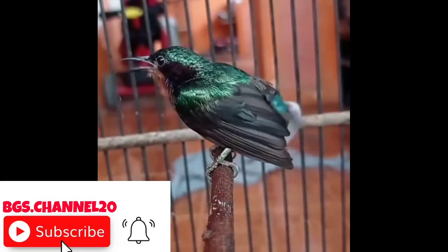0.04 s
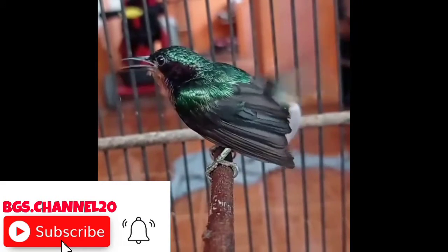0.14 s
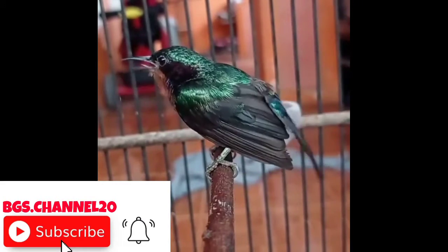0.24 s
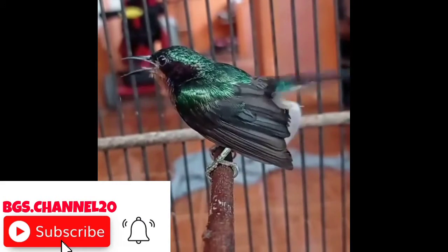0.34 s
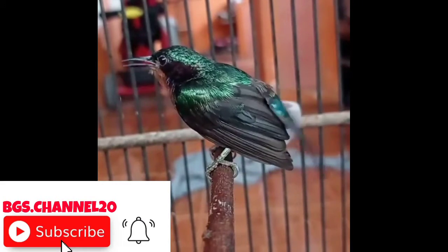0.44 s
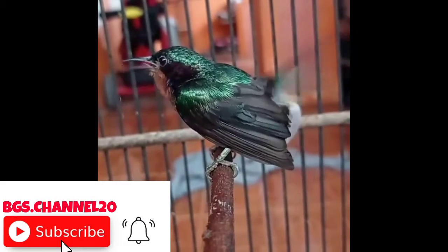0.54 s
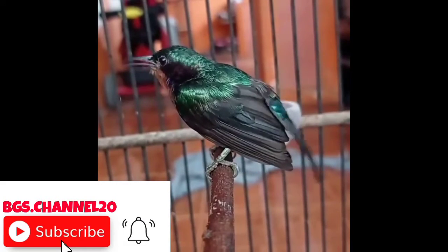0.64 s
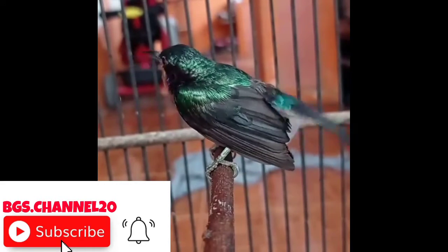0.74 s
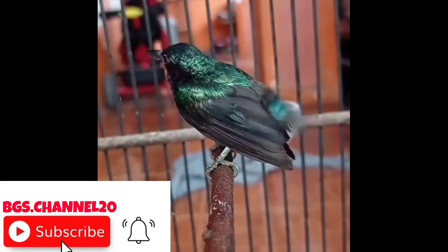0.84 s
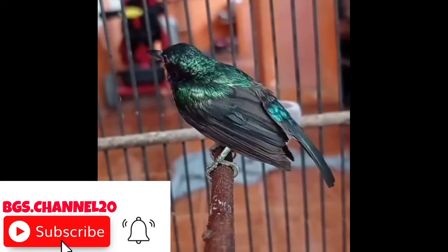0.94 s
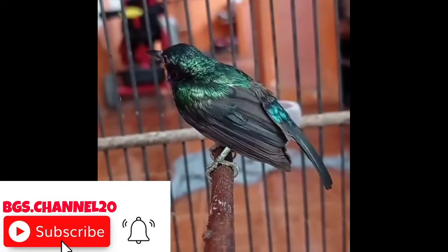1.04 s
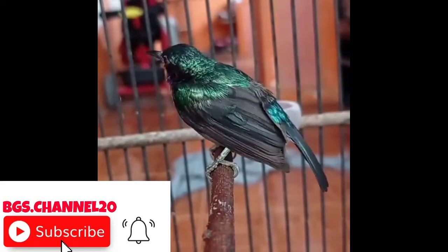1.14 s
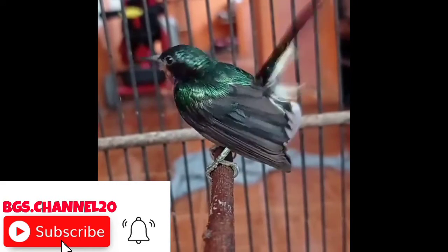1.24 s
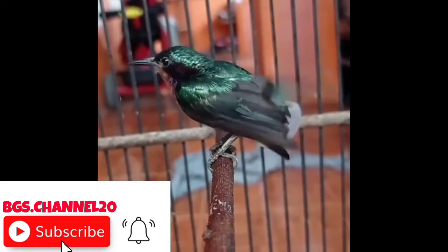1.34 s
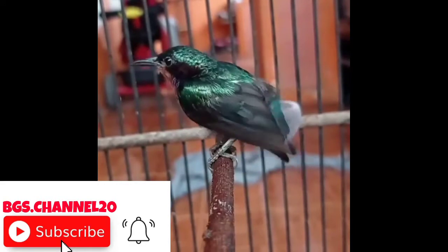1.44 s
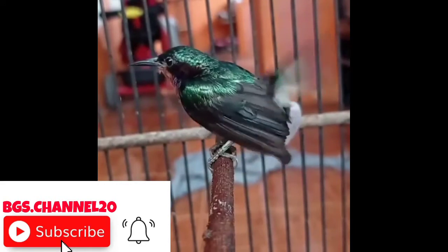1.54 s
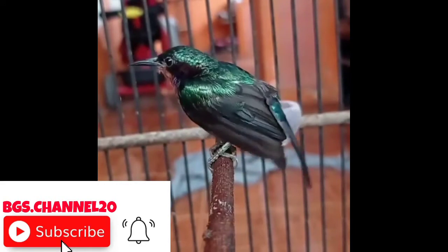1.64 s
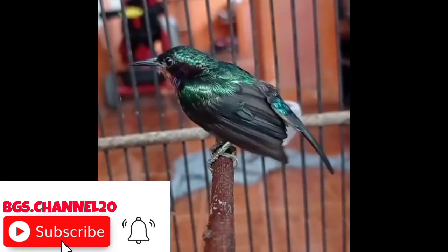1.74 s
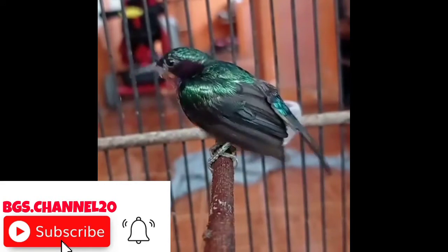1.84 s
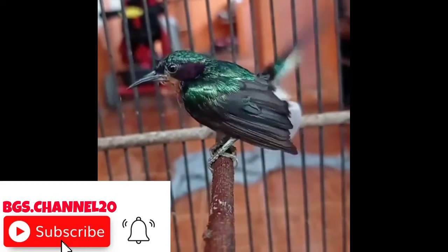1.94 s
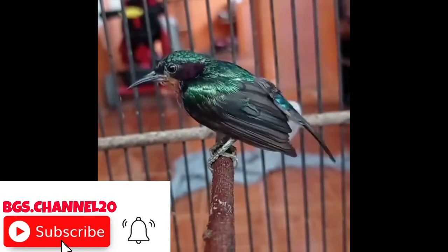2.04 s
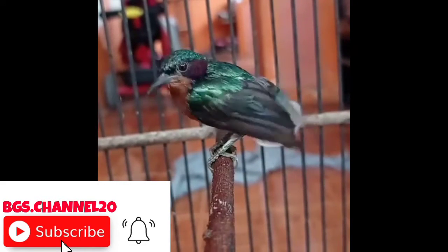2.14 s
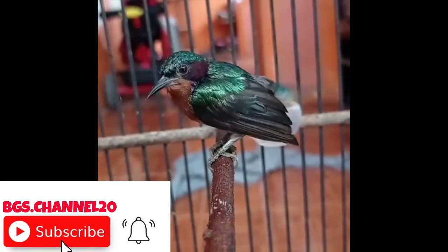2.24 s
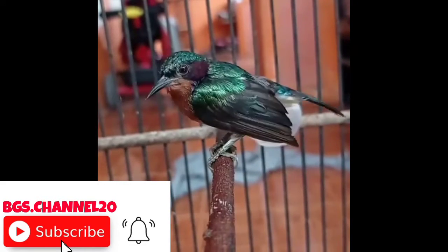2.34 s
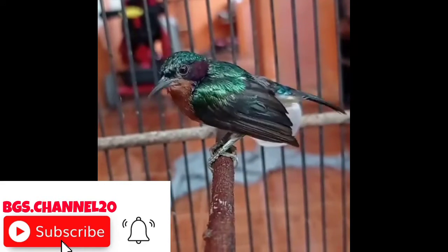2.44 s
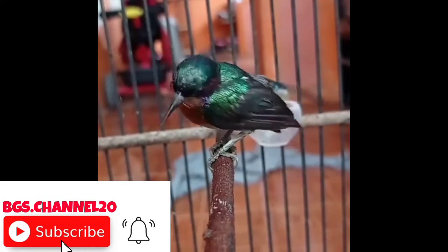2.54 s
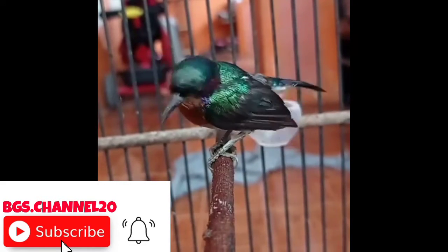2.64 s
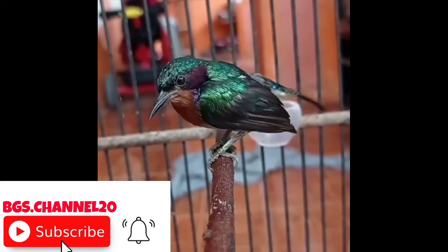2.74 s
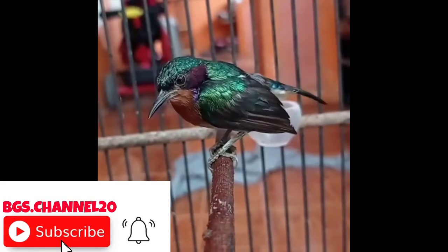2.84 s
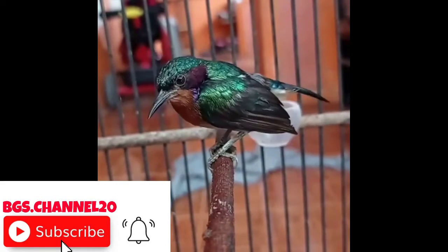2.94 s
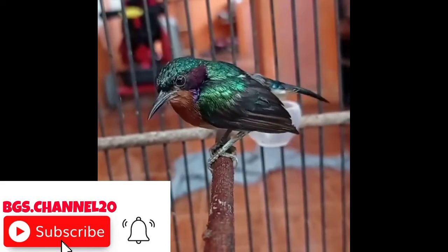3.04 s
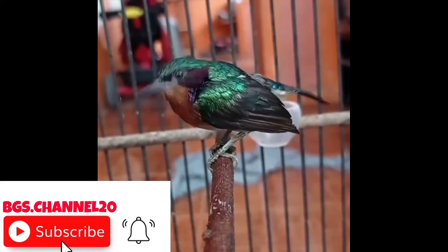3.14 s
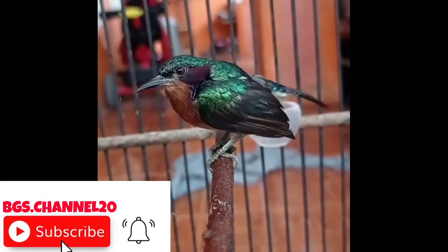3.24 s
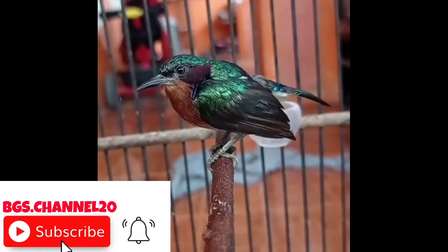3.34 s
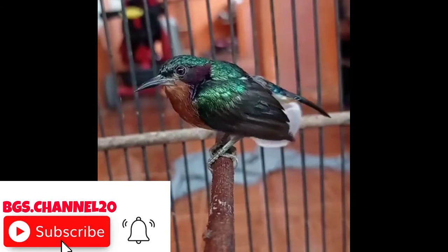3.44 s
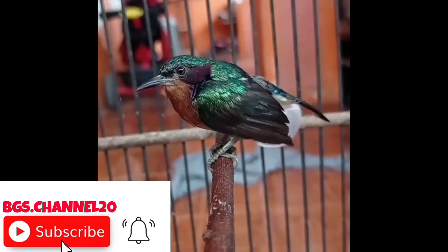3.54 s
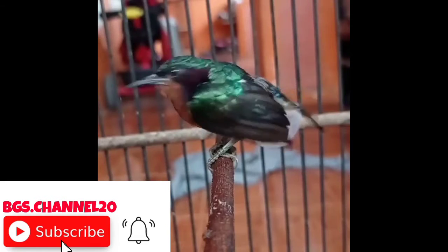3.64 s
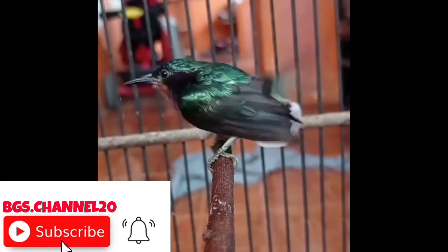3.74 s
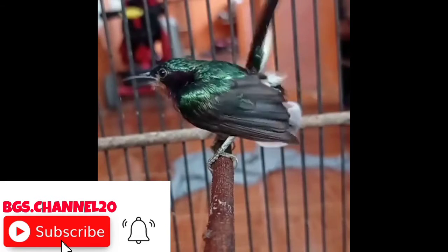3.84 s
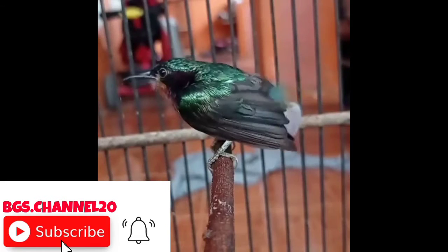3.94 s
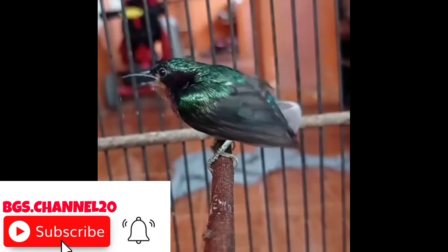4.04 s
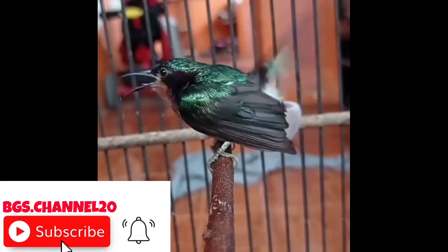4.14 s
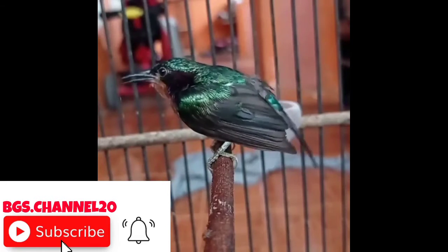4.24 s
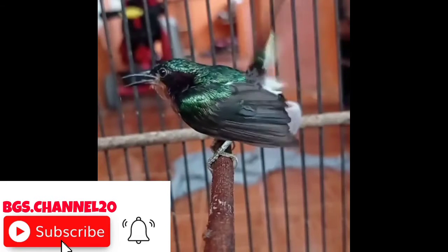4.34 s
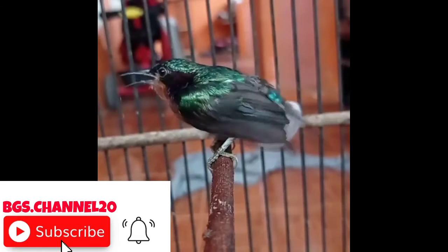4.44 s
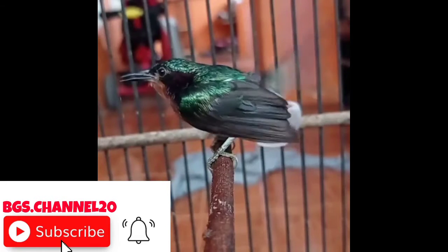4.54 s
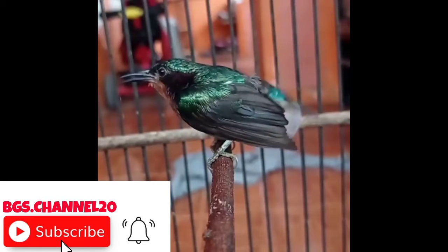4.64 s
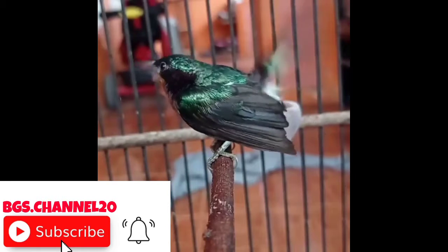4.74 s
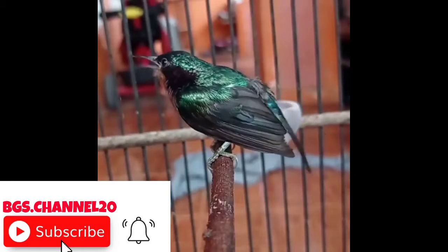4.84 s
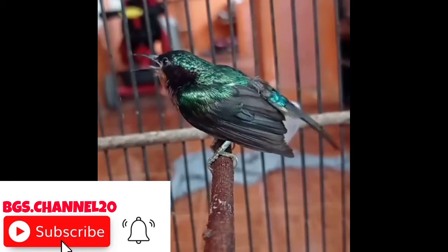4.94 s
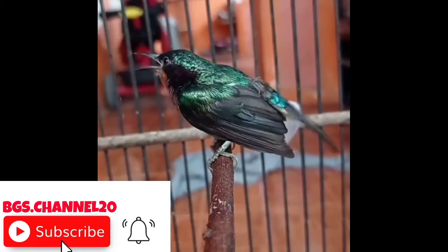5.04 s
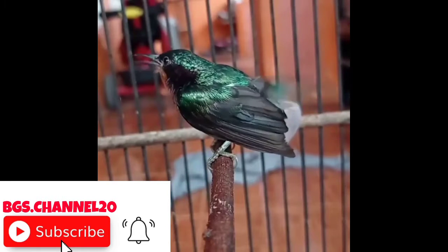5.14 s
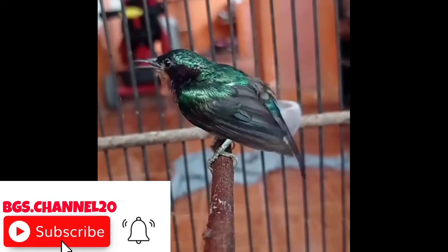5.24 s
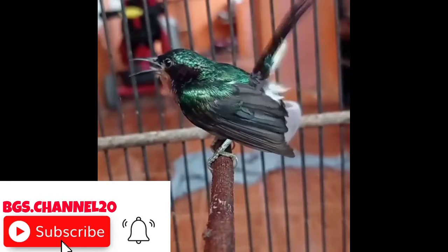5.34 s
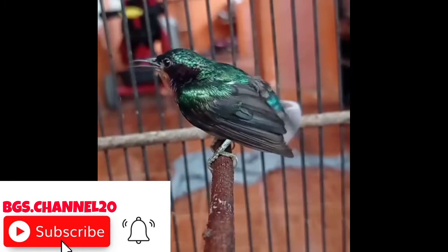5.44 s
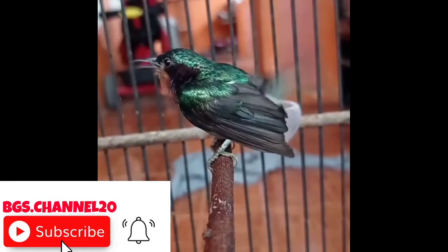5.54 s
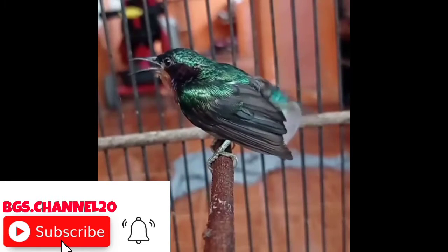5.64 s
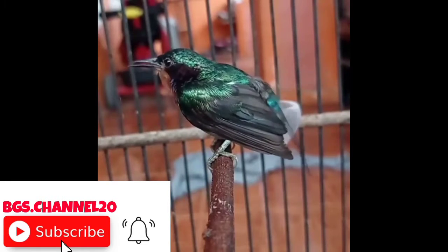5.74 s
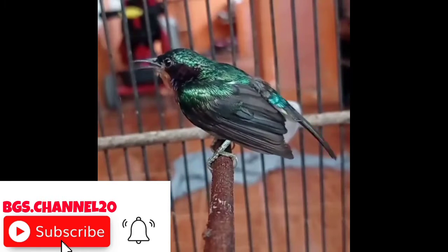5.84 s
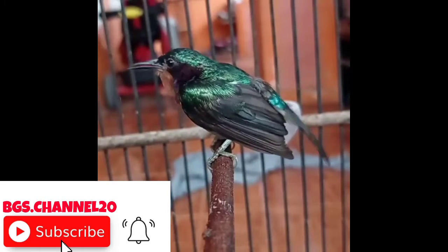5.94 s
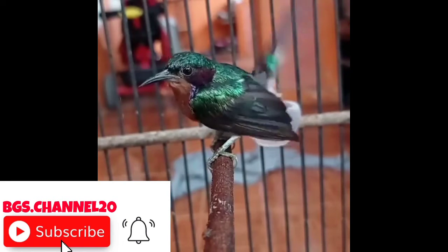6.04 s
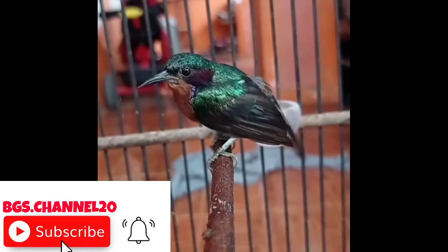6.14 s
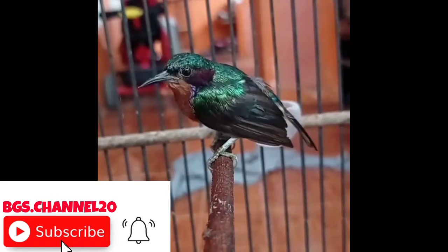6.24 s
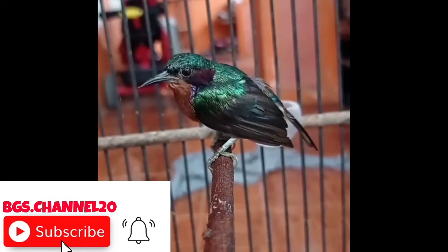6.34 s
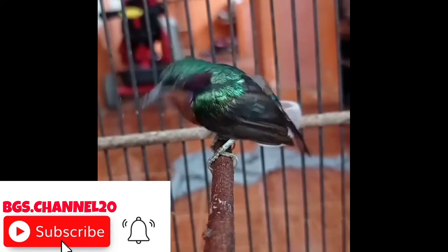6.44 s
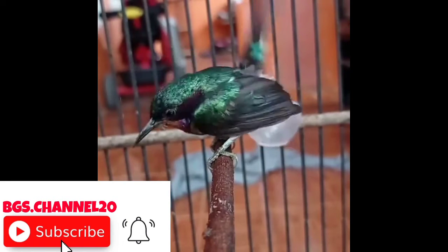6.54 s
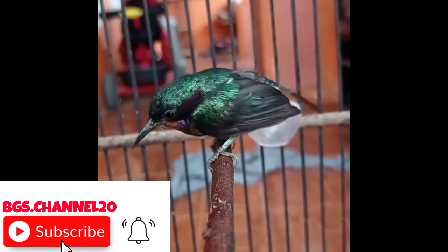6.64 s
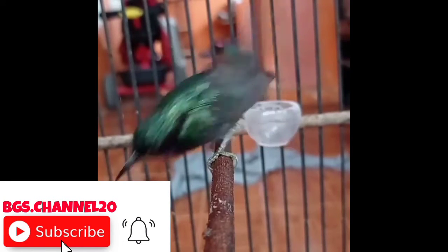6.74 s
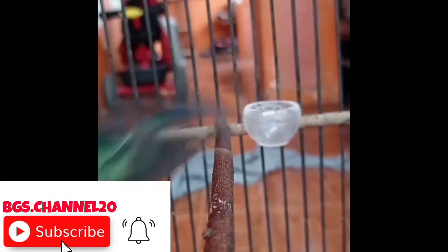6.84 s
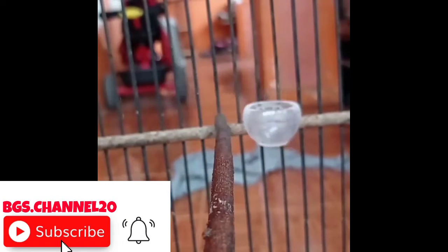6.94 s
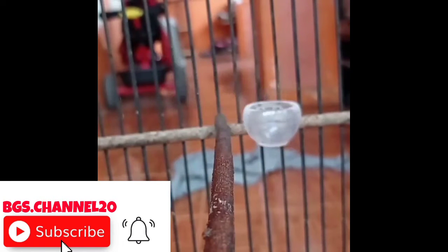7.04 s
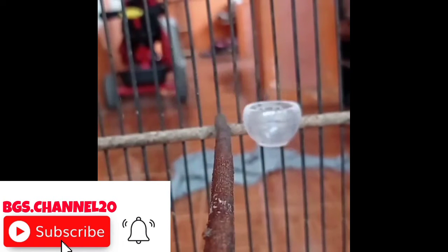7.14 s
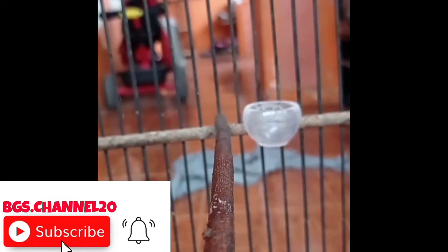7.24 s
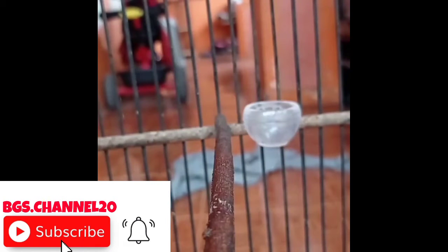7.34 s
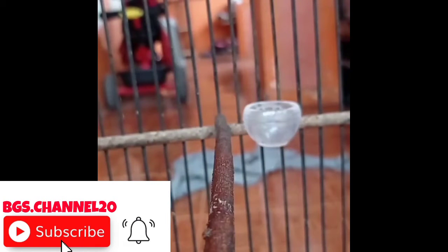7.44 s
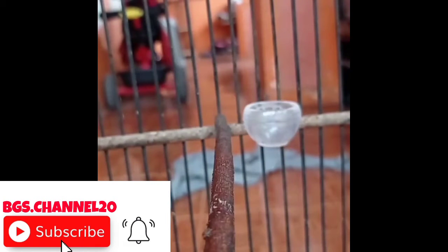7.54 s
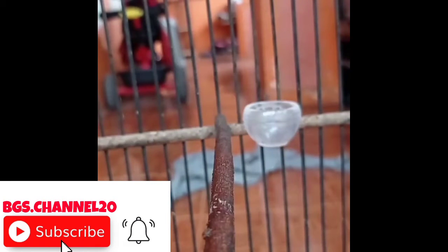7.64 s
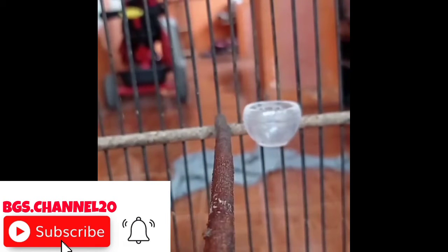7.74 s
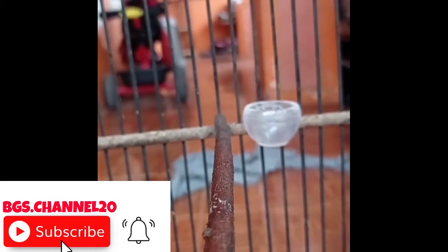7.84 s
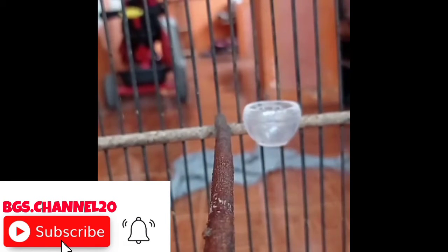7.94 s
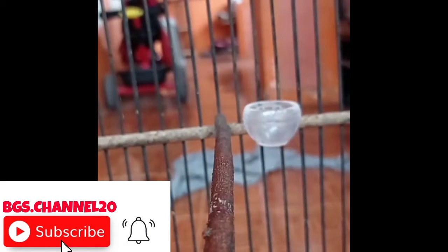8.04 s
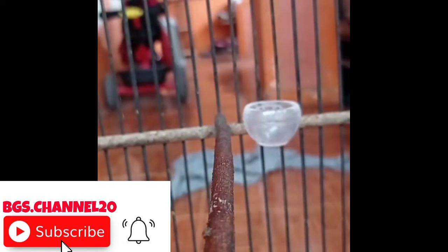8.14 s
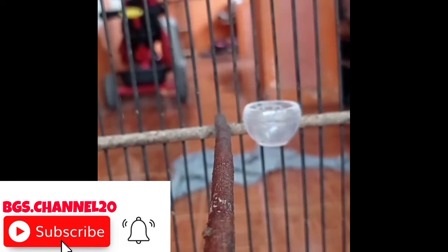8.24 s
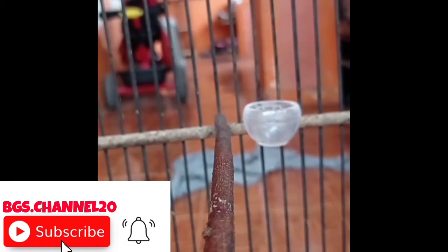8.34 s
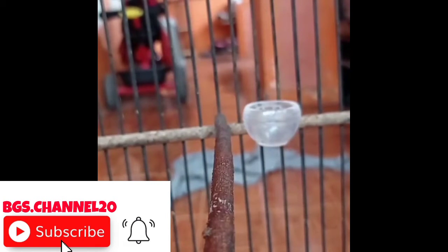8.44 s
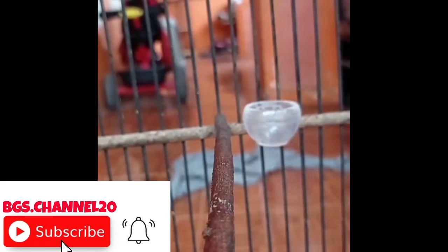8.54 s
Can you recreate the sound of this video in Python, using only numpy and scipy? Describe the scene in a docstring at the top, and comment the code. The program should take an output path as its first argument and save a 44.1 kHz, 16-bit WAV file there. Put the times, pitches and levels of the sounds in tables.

```python
"""A caged sunbird twitters close by: short dipping notes, falling sweeps and sharp chips, with faint cage ticks.
Farther off a second bird sings falling sweeps, washed in the ring of a hard-walled porch.
Behind them street noise rises and falls, a distant horn and a short toot sound, a motorbike draws near.
Birds are sines with gliding pitch, rasp and a second voice, convolved with reflections; traffic is shaped
noise; horns and motorbike are sums of harmonics."""
import sys
import numpy as np
from scipy import signal
from scipy.fft import rfft, irfft
from scipy.io import wavfile
from scipy.ndimage import uniform_filter1d

SR = 44100
rng = np.random.default_rng(int(sys.argv[2]) if len(sys.argv) > 2 else 0)


def to_wav(s):
    """Save 16-bit WAV."""
    ch = np.atleast_2d(s).T  # columns
    pcm = np.round(np.clip(ch, -1, 1) * 32767)  # PCM
    wavfile.write(sys.argv[1], SR, pcm.astype(np.int16))


N = 378378
TIME_S = np.arange(N) / SR

# All levels are relative: the mix and the spectra scale them further.
# Street noise. Each row: time in seconds, boom level in dB, rumble level in dB, roar level in dB.
TRAFFIC_LEVELS = [(0, -64.5, -76, -83), (.3, -69.5, -76, -76), (.6, -63.5, -68, -63),
                  (1.6, -57.5, -52, -56), (2.4, -61, -54.5, -55.5), (3.15, -52.5, -46.5, -48.5),
                  (3.7, -49.5, -54.5, -55), (4.25, -48, -54.5, -50.5), (4.55, -50, -58.5, -58),
                  (5.031, -57.5, -54, -56.5), (5.352, -53, -61.5, -74.5), (5.8, -56.5, -64.5, -57.5),
                  (6.2, -47, -48, -60), (6.5, -52.5, -54.5, -64), (7.15, -41.5, -43.5, -50.5),
                  (7.4, -57, -51, -52), (8.1, -50, -50, -47.5), (8.58, -48, -43, -42)]
# Low street band. Each row: frequency in Hz, density in dB per Hz.
BOOM_SPECTRUM = [(25, -31), (50, -23.5), (80, -5.5), (120, -7.5), (190, -16.5), (2000, -100)]
# Middle street band. Each row: frequency in Hz, density in dB per Hz.
RUMBLE_SPECTRUM = [(70, -39.5), (135, -1.5), (230, -4), (350, -4), (480, -20), (4000, -100)]
# Upper street band. Each row: frequency in Hz, density in dB per Hz.
ROAR_SPECTRUM = [(200, -17.5), (400, -2.5), (660, -3.5), (820, -15.5), (1200, -22.5), (2400, -52),
                 (9000, -83.5)]
# Narrow low peaks in the street noise, many at motorbike harmonics. Each row: frequency in Hz, boost in dB.
STREET_PEAKS = [(97, 8), (135, 2), (194, 3), (228, 7.5), (350, 1), (455, 0), (615, 9.5)]
# Tyre hiss. Each row: time in seconds, level in dB.
TYRE_LEVELS = [(0, -86.5), (.6, -74.5), (1.1, -78), (2.2, -67), (3.7, -62.5), (4.2, -65), (4.55, -72),
               (5.1, -73), (6.25, -67), (7.2, -56.5), (8.1, -52.5), (8.58, -47)]
# Tyre hiss. Each row: frequency in Hz, density in dB per Hz.
TYRE_SPECTRUM = [(300, -19.5), (800, 13), (1400, 10.5), (2400, 6), (4000, 2.5), (6500, 3.5), (8500, -17),
                 (10500, -20), (13000, -39)]
# Steady air noise. Each row: frequency in Hz, density in dB per Hz.
AIR_SPECTRUM = [(200, -17.5), (450, -15.5), (670, 17), (900, -10.5), (2800, -18.5), (4500, 6.5),
                (7000, -0.5), (8500, -30.5), (13000, -10)]
# Horns. Each row: start in seconds, length in seconds, fundamental in Hz, number of the loudest harmonic,
# level of that harmonic in dB, fall per harmonic away from it in dB.
HORN_CALLS = [(2.953, 1.17, 150.4, 5, -58, 7.5), (7.234, 0.019, 358, 4, -46.5, 11)]
# Motorbike. Each row: time in seconds, firings per second, level in dB.
MOTORBIKE_COURSE = [(0, 22, -72), (1.7, 21, -63), (2.2, 19.4, -53), (2.9, 17.8, -54), (3.3, 20, -50),
                    (4.1, 16.1, -49), (4.7, 17, -60), (5.7, 18, -61), (6.3, 18.1, -51), (7.1, 18.6, -48),
                    (7.27, 18.5, -40), (7.56, 18.5, -39.5), (7.68, 19.25, -39.2), (8.1, 19.35, -38.2),
                    (8.58, 19.45, -34)]
# Exhaust resonances. Each row: frequency in Hz, gain in dB.
EXHAUST_RESPONSE = [(50, -31), (80, -11), (92, -8), (97, 11), (110, 4), (130, 8), (160, -4), (190, 3.5),
                    (225, 5), (270, -14), (300, -0.5), (350, -1), (410, -7), (455, -2), (500, -8),
                    (620, -8), (800, -24.5)]
# Cage wire ticks. Each row: start in seconds, level in dB.
CAGE_TICKS = [(7.24, -52), (8.125, -52)]
# Reverberation time of the porch. Each row: frequency in Hz, time to fall 60 dB in seconds.
PORCH_T60 = [(7000, 0.42), (12000, 0.23)]
# Hoarse noise of the syrinx. Each row: frequency in Hz, density in dB per Hz.
RASP_SPECTRUM = [(300, -26), (2800, -0.5), (4500, 15), (7000, 25), (8800, 5.5), (10800, -2), (13000, -20.5)]
# Far bird's sweeps. Each row: start in seconds, length in seconds, top in Hz, bottom in Hz,
# ease (higher levels out earlier), level in dB, fade over the note in dB, rasp in dB.
FAR_SWEEPS = [(0.0, 0.11, 7770, 3880, 2.3, -48, 23, -16), (0.02, 0.13, 5500, 3750, 1.2, -49, 6, -32),
              (0.284, 0.22, 7440, 3660, 2.5, -42.5, 29, -45), (0.685, 0.11, 7060, 3330, 1.44, -43, 19, -34),
              (0.881, 0.098, 7500, 3210, 4.5, -44.5, 17, -40), (0.931, 0.2, 7310, 3020, 1.24, -42, 21, -21),
              (1.413, 0.15, 7040, 3485, 1.5, -42, 12.5, -38.5),
              (1.625, 0.096, 7590, 3270, 0.9, -40.5, 13, -23),
              (1.871, 0.073, 6580, 3560, 0.9, -47, 12.5, -14.5),
              (2.068, 0.081, 7860, 3194, 2, -47, 17.5, -8), (2.225, 0.16, 6350, 3625, 3.1, -55, 6, -38),
              (2.505, 0.057, 6200, 3430, 0.7, -46.5, 18, -13.5),
              (2.592, 0.15, 7930, 3855, 2.5, -41, 20, -34),
              (2.811, 0.15, 7900, 3576, 3.5, -40.5, 32, -18.5),
              (3.042, 0.097, 7880, 3970, 1.5, -35.5, 19, -33), (3.179, 0.15, 7130, 4023, 2, -32.5, 10, -31),
              (3.339, 0.082, 8200, 5330, 3, -41, 3, -21.5),
              (3.522, 0.097, 7770, 3800, 2.7, -41.5, 19.5, -23),
              (3.697, 0.13, 7750, 3740, 3, -42.5, 20, -41), (3.96, 0.096, 7820, 3960, 2.4, -44.5, 12, -32),
              (3.984, 0.17, 7830, 4150, 1.86, -34.5, 19, -22.5), (4.09, 0.087, 8360, 5860, 3, -44, 5, -17),
              (4.213, 0.055, 7430, 4236, -2, -36, -4, -21), (4.415, 0.042, 7960, 4410, -1.5, -37, 6, -20),
              (4.647, 0.052, 7760, 4150, 1, -44, 24, -31), (4.865, 0.13, 7270, 4010, 0.7, -46.5, 7, -15),
              (5.086, 0.15, 7550, 3880, 1.25, -40.5, 23.5, -16.5),
              (5.36, 0.24, 7940, 3957, 5, -49, 38, -22), (5.684, 0.067, 7330, 3900, 2.1, -46, 19, -38),
              (5.95, 0.17, 7120, 3730, 2.5, -40.5, 28, -39), (6.17, 0.097, 7500, 4090, 1.5, -44.5, 19, -40),
              (6.578, 0.057, 7770, 4100, 3, -44, 23, -45), (6.794, 0.086, 7940, 3880, 1.56, -40.5, 7, -35),
              (7.022, 0.068, 7760, 3870, 5, -45.5, 41.5, -14.5),
              (7.262, 0.12, 7570, 4270, 4, -47.5, 32, -21), (7.442, 0.089, 7920, 4250, 2, -45, 18, -35),
              (7.538, 0.069, 6870, 3700, 0.5, -42.5, 24, -18), (7.675, 0.22, 7120, 3416, 3, -40, 28, -38),
              (7.782, 0.056, 6750, 5420, 0.5, -38, 17, -17.5), (7.868, 0.19, 6980, 3970, 4, -45, 11.5, -26),
              (8.31, 0.16, 6200, 3920, 3.5, -52.5, 3, -29), (8.423, 0.095, 6200, 3280, 2, -51.5, 16, -13)]
# Sweep level by pitch, weakest at the top. Each row: pitch in Hz, gain in dB.
SWEEP_GAIN = [(4000, 0.5), (7000, 1.5), (8200, -5)]
# Near bird's whistles. Each row: start in seconds, length in seconds, start pitch in Hz, pitch at the turn in Hz,
# turn as a share of the length, level in dB, swell over the note in dB.
WHISTLES = [(0.170, 0.056, 8260, 6760, 0.47, -29, -14), (0.247, 0.025, 7470, 6390, 0.45, -18.5, -4.5),
            (0.316, 0.022, 7000, 6250, 0.48, -19, 1), (0.389, 0.028, 6670, 6190, 1.17, -17, 3),
            (0.485, 0.073, 8380, 5793, 1.03, -21, 12), (0.631, 0.073, 7770, 5430, 1.23, -20.5, 6),
            (0.778, 0.1, 7730, 4920, 1.22, -22, -2), (0.961, 0.11, 7470, 4505, 1.16, -22.5, -3),
            (4.497, 0.049, 7170, 6820, 0.4, -11.5, -4), (4.611, 0.029, 4060, 5960, 0.44, -19, -14),
            (4.66, 0.05, 6930.0, 6140, 0.44, -16.5, 6), (4.745, 0.023, 4270, 6250, 0.82, -18.5, 9),
            (5.134, 0.0071, 7600, 6940, 0.61, -15.5, -2), (5.192, 0.019, 7820, 6630, 0.97, -23.5, 7),
            (5.256, 0.042, 7900, 6460, 0.58, -19, -11), (5.331, 0.052, 7630, 6410, 0.51, -22, -32),
            (5.431, 0.095, 8430, 5880, 0.83, -20.5, 2), (5.561, 0.092, 8460, 5675, 0.92, -20.5, 9),
            (5.709, 0.085, 7990, 5383, 1.185, -20, 6.5), (5.859, 0.095, 8000, 5300, 1.23, -22.5, -3),
            (5.912, 0.051, 5450, 5230, 0.9, -24.5, 13), (6.033, 0.11, 8080, 4725, 1.14, -22.5, 0),
            (6.25, 0.11, 7710, 4170, 1.21, -23, -9), (6.286, 0.027, 5330, 5150, 0.78, -27.5, 1)]
# Whistle level by pitch, coloured by a close reflection. Each row: pitch in Hz, gain in dB.
REFLECTION_GAIN = [(4000, 9), (4800, -2.5), (5500, 2), (6000, -9), (6600, 4), (7200, -8.5), (8200, -1)]
# Near bird's rising chips. Each row: start in seconds, length in seconds, start pitch in Hz, top in Hz,
# level in dB, swell over the note in dB, rasp in dB.
CHIPS = [(1.700, 0.018, 4600, 7100, -36.5, 16, -4.5), (4.256, 0.015, 4240, 7440, -28, 20, -10.5),
         (4.360, 0.024, 4400, 7500, -25.5, 6, -6), (4.445, 0.013, 4575, 7230, -22.5, 13, -14.5),
         (4.461, 0.022, 4360, 7100, -26, 0, -7), (4.783, 0.017, 4900, 6870, -24, 16.5, -24),
         (4.802, 0.0091, 5370, 6690, -19.5, 13.5, -31), (4.836, 0.015, 4780, 6650, -22.5, 18.5, -18),
         (4.849, 0.0067, 5100, 6800, -32, 9, -15), (4.881, 0.0098, 5510, 7380, -22, 8, -14)]

PEAK_HALF_WIDTH_HZ = 4.1
EXHAUST_BLUR_TURNS = 0.0105  # rms, per harmonic order
SECOND_VOICE_RATIO = 0.84  # pitch of the other side of the syrinx
SWEEP_LINGER = 1.4  # above 1, a sweep hangs at its top before it falls
SWEEP_JITTER, SWEEP_SETTLE, SWEEP_DIRECT_DB = 0.02, 0.8, -4.5
SWEEP_SECOND_DB, SWEEP_SECOND_FADE_DB = -15.5, 29.5  # start of the second voice, extra fade over the note
REBOUND = 0.18  # how strongly a whistle swings back after its turn
WHISTLE_RASP_DB, CHIP_SECOND_DB = -54, -2.5
CHIP_JITTER, CHIP_RISE = 0.02, 0.35  # pitch tremble as a share, attack as a share of the length
GHOST_STEP_HZ, BAND_EDGE_HZ = 3888, 13050


def gain_of(db):
    """Decibels to amplitude."""
    return 10 ** (np.asarray(db) / 20)


def evened(x):
    """Scales to rms 1."""
    return x / np.sqrt(np.mean(x ** 2) + 1e-20)


def read(points, hz):
    """Interpolates a table on a log-frequency axis."""
    table_hz, value = np.transpose(points)
    return np.interp(np.log(hz + 1), np.log(table_hz + 1), value)


def course(s, db):
    """Amplitude over the scene from levels at given times."""
    return gain_of(np.interp(TIME_S, s, db))


def add(mix, s, sound):
    """Mixes a sound in at time s."""
    part = mix[max(round(s * SR), 0):][:len(sound)]
    part += sound[:len(part)]


def noise(spectrum):
    """Gaussian noise of rms 1 with the given spectrum."""
    hz = np.fft.rfftfreq(N, 1 / SR)
    return evened(irfft(rfft(rng.standard_normal(N)) * gain_of(read(spectrum, hz)), N))


def wander(rate_hz):
    """Smooth random course of rms 1, rolled off around the rate."""
    hz = np.fft.rfftfreq(N, 1 / SR)
    return evened(irfft(rfft(rng.standard_normal(N)) * np.exp(-(hz / rate_hz) ** 2), N))


def mottle(x, depth_db, count, size):
    """Random patches of level, count frames long and size bins wide."""
    z = signal.stft(x, SR, nperseg=1024, noverlap=768)[2]
    patches = uniform_filter1d(rng.standard_normal(z.shape), count, 1)
    patches = evened(uniform_filter1d(patches, size, 0))
    patched = signal.istft(z * gain_of(depth_db * patches), SR, nperseg=1024, noverlap=768)[1]
    return np.std(x) * evened(patched[:N])


def scatter(x, t60_s):
    """A quick cluster of reflections off surfaces close to a bird, energy 1."""
    t = np.arange(SR // 10) / SR
    taps = rng.standard_normal(len(t)) * (rng.random(len(t)) < .03)
    taps = taps * gain_of(-60 * t / t60_s) * (t > .001)
    return signal.fftconvolve(x, taps / np.linalg.norm(taps))[:N]


def porch(x, onset_s):
    """Dense reflections of energy 1 that build up over the onset; each band dies at its own speed."""
    taps = rng.standard_normal(SR) * (rng.random(SR) < 4000 / SR)
    hz, t, z = signal.stft(taps, SR, nperseg=256)
    decay = gain_of(-60 * t / read(PORCH_T60, hz)[:, None])
    tail = signal.istft(z * decay, SR, nperseg=256)[1]
    tail = tail * np.minimum(np.arange(len(tail)) / (onset_s * SR), 1) ** 2
    return signal.fftconvolve(x, tail / np.linalg.norm(tail))[:N]


def traffic():
    """Boom, rumble and roar coloured by narrow low peaks, with tyre hiss, over steady air noise."""
    s, *levels = np.transpose(TRAFFIC_LEVELS)
    bands = (BOOM_SPECTRUM, RUMBLE_SPECTRUM, ROAR_SPECTRUM)
    low = sum(course(s, db) * noise(band) for db, band in zip(levels, bands))
    hz = np.fft.rfftfreq(2 * N, 1 / SR)
    boost_db = sum(db / (1 + ((hz - peak_hz) / PEAK_HALF_WIDTH_HZ) ** 2) for peak_hz, db in STREET_PEAKS)
    low = irfft(rfft(low, 2 * N) * gain_of(boost_db - 2.5))[:N]
    low = mottle(low, depth_db=4.5, count=24, size=1)
    hiss = course(*np.transpose(TYRE_LEVELS)) * mottle(noise(TYRE_SPECTRUM), depth_db=2.5, count=8, size=8)
    return low + hiss + gain_of(-72.5) * noise(AIR_SPECTRUM)


def horns():
    """Distant wavering horns: only a few harmonics around the flare's resonance carry this far."""
    out = np.zeros(N)
    for s, length_s, hz, loudest, db, fall_db in HORN_CALLS:
        drift = wander(12.0)[:round(length_s * SR)]  # moves pitch and level together
        turns = np.cumsum(hz * (1 + 0.003 * drift)) / SR
        tone = np.zeros(len(drift))
        for k in range(-1, 3):
            tone += gain_of(db - fall_db * abs(k)) * np.sin(2 * np.pi * (round(loudest) + k) * turns)
        add(out, s, np.sqrt(2) * tone * gain_of(drift) * signal.windows.tukey(len(drift), .7))
    return out


def motorbike():
    """A slowly firing single cylinder: harmonics shaped by the exhaust, phase wander blurs the higher ones."""
    s, rate_hz, db = np.transpose(MOTORBIKE_COURSE)
    firing_hz = np.interp(TIME_S, s, rate_hz) * (1 + 0.0041 * wander(7.1))
    turns = np.cumsum(firing_hz) / SR
    blur, hum = EXHAUST_BLUR_TURNS * wander(3.6), np.zeros(N)
    for k in range(3, 40):
        own_blur = np.roll(blur, rng.integers(N))
        phase = k * (turns + own_blur) + rng.random()
        level = np.interp(TIME_S, s, gain_of(read(EXHAUST_RESPONSE, k * rate_hz)))
        hum += level * np.sin(2 * np.pi * phase)
    return course(s, db) * evened(hum)


def cage():
    """Faint dry ticks of the cage wire: decaying bursts of noise."""
    out, t = np.zeros(N), np.arange(SR // 20) / SR
    for s, db in CAGE_TICKS:
        add(out, s, gain_of(db - 60 * t / 0.16) * noise(RASP_SPECTRUM)[:len(t)])
    return out


def sing(notes, gesture, jitter, jitter_hz, flutter_db, rise, fade, overtone_db, release_s, settle=0):
    """A syrinx: a sine follows the gesture, rasp and octave grow together, the tremble may settle."""
    out, flutter, hoarse = np.zeros(N), wander(160), noise(RASP_SPECTRUM)
    tremble = jitter * wander(jitter_hz)
    for s, length_s, *shape in notes:
        t = np.arange(round((length_s + release_s) * SR)) / SR
        along = np.minimum(t / length_s, 1)
        at = (round(s * SR) + np.arange(len(t))) % N
        glide_hz, level_db, rasp_db = gesture(along, *shape)
        hz = glide_hz * (1 + tremble[at] * (1 - settle * along))
        phase = 2 * np.pi * np.cumsum(hz) / SR
        harshness = hoarse[at] + np.sqrt(2) * gain_of(overtone_db) * np.sin(2 * phase)
        voice = np.sqrt(2) * np.sin(phase) + gain_of(rasp_db) * harshness
        attack = np.minimum(along / rise, 1)
        ending = np.minimum((t[-1] - t) / (release_s + fade * length_s), 1)
        envelope = np.sin(np.pi / 2 * attack * ending) ** 2
        add(out, s, gain_of(level_db + flutter_db * flutter[at]) * envelope * voice)
    return out


def sweep(along, top_hz, bottom_hz, ease, db, fade_db, rasp_db):
    """The pitch hangs at the top, then drops; the ease sets how early it levels out."""
    fallen = np.expm1(-ease * along ** SWEEP_LINGER) / np.expm1(-ease)
    hz = top_hz + (bottom_hz - top_hz) * fallen
    return hz, db - fade_db * (along - .5) + read(SWEEP_GAIN, hz), rasp_db


def sweep_second(along, *shape):
    """The other side of the syrinx doubles the start of a sweep at a lower pitch."""
    hz, db, rasp_db = sweep(along, *shape)
    return SECOND_VOICE_RATIO * hz, db + SWEEP_SECOND_DB - SWEEP_SECOND_FADE_DB * along, rasp_db


def far_bird():
    """Doubled sweeps whose tremble settles, amid reflections, with the recorder's faint shifted copy, blurred."""
    song = sing(FAR_SWEEPS, sweep, jitter=SWEEP_JITTER, jitter_hz=500, flutter_db=4.0, rise=0.17, fade=0.1,
                overtone_db=-21, release_s=0.011, settle=SWEEP_SETTLE)
    song = song + sing(FAR_SWEEPS, sweep_second, jitter=SWEEP_JITTER, jitter_hz=403, flutter_db=4.5,
                       rise=0.04, fade=0.074, overtone_db=-21, release_s=0.011)
    # ghost: the recorder's copy of the song shifted up, kept around 10-12 kHz
    ghost = (signal.hilbert(song) * np.exp(2j * np.pi * GHOST_STEP_HZ * TIME_S)).real
    ghost = signal.sosfilt(signal.butter(4, [10000, 12000], "band", fs=SR, output="sos"), ghost)
    close = gain_of(SWEEP_DIRECT_DB) * song + gain_of(-8) * scatter(song, t60_s=0.037)
    ring = gain_of(-1.5) * porch(song, onset_s=0.0067)
    return close + ring + gain_of(-38.5) * porch(ghost, onset_s=0.002)


def whistle(along, start_hz, turn_hz, turn, db, swell_db):
    """Pitch glides to its turn and swings back; a close reflection strengthens some pitches and weakens others."""
    phase = np.minimum(along / turn, 2)
    away = (1 - np.sin(np.pi / 2 * phase)) * np.where(phase > 1, REBOUND, 1)
    hz = turn_hz + (start_hz - turn_hz) * away
    return hz, db + swell_db * (along - .5) + read(REFLECTION_GAIN, hz), WHISTLE_RASP_DB


def chip(along, start_hz, top_hz, db, swell_db, rasp_db):
    """The pitch shoots up at an even rate in octaves."""
    return start_hz * (top_hz / start_hz) ** along, db + swell_db * (along - .5), rasp_db


def chip_second(along, start_hz, top_hz, db, swell_db, rasp_db):
    """The other side of the syrinx holds a pitch under the chip's top."""
    hz = np.full_like(along, SECOND_VOICE_RATIO * top_hz)
    return hz, db + CHIP_SECOND_DB + swell_db * (along - .5), rasp_db


def near_bird():
    """Clean whistles and harsh two-voiced chips, smeared by close reflections, with a light porch tail."""
    whistles = sing(WHISTLES, whistle, jitter=0.0008, jitter_hz=300, flutter_db=2.5, rise=0.3, fade=0.17,
                    overtone_db=8.5, release_s=0.012)
    chips = sing(CHIPS, chip, jitter=CHIP_JITTER, jitter_hz=610, flutter_db=3.5, rise=CHIP_RISE, fade=0.12,
                 overtone_db=-23, release_s=0.0039)
    chips = chips + sing(CHIPS, chip_second, jitter=CHIP_JITTER, jitter_hz=717, flutter_db=2.0, rise=CHIP_RISE,
                         fade=0.098, overtone_db=-29.5, release_s=0.003)
    direct = gain_of(-3.5) * (whistles + chips)
    close = scatter(gain_of(-10.0) * whistles + gain_of(-12) * chips, t60_s=0.16)
    return direct + close + porch(gain_of(-22.0) * whistles + gain_of(-17.5) * chips, onset_s=0.025)


def scene():
    """Both birds and the cage over the street."""
    return (traffic() + horns() + motorbike() + cage() + far_bird() + near_bird())[None]


def record(dry):
    """Sound above about 3 kHz gains faint copies one and two steps below and one above; then the band limit."""
    step = np.exp(2j * np.pi * GHOST_STEP_HZ * TIME_S)
    treble = signal.hilbert(signal.sosfilt(signal.butter(4, 3000, "high", fs=SR, output="sos"), dry))
    shifts = gain_of(-33) / step + gain_of(-38) * step + gain_of(-46) / step ** 2
    ghosts = (treble * shifts).real
    band_limit = signal.firwin(511, BAND_EDGE_HZ, window=("kaiser", 9), fs=SR)
    return signal.oaconvolve(dry + ghosts, band_limit[None], "same")


dry = scene()
out = record(dry)
to_wav(out)
```